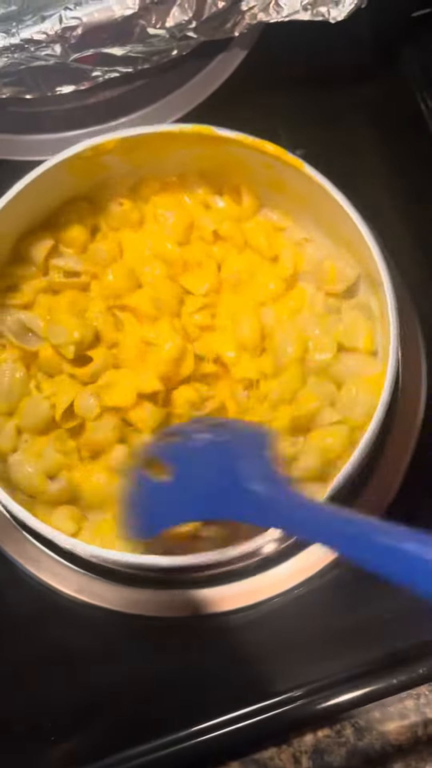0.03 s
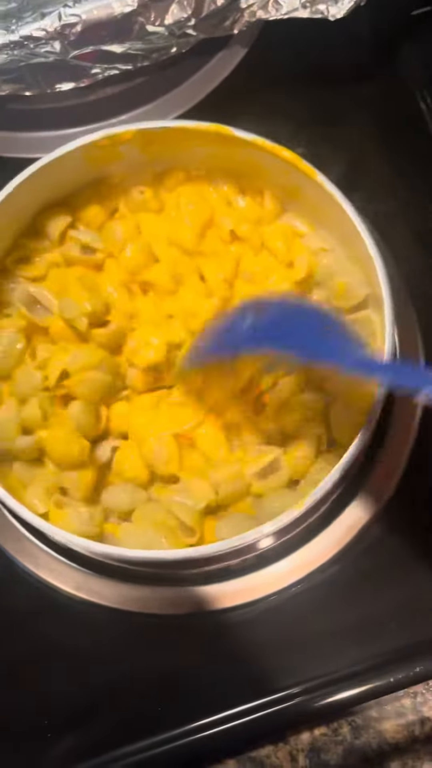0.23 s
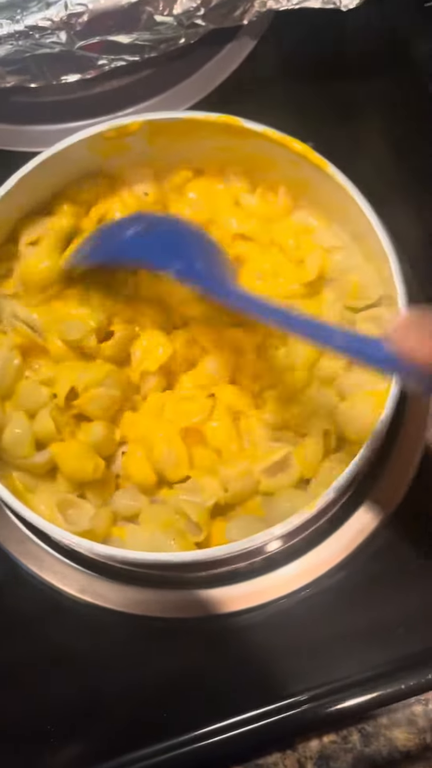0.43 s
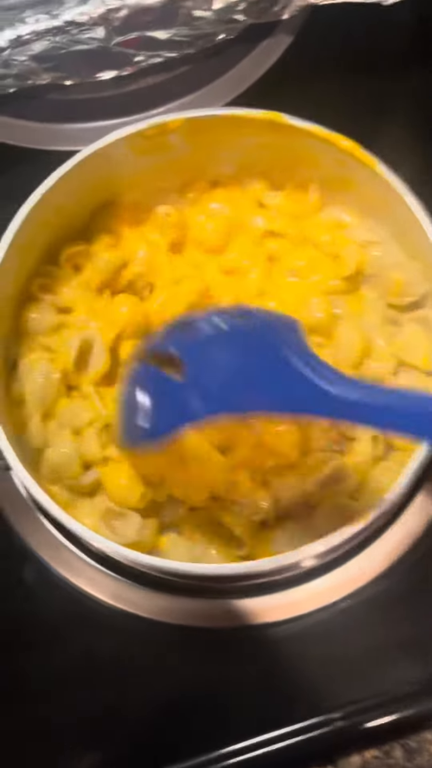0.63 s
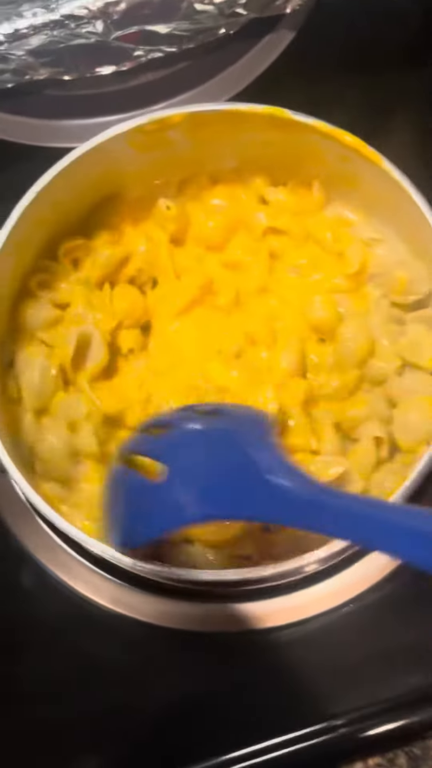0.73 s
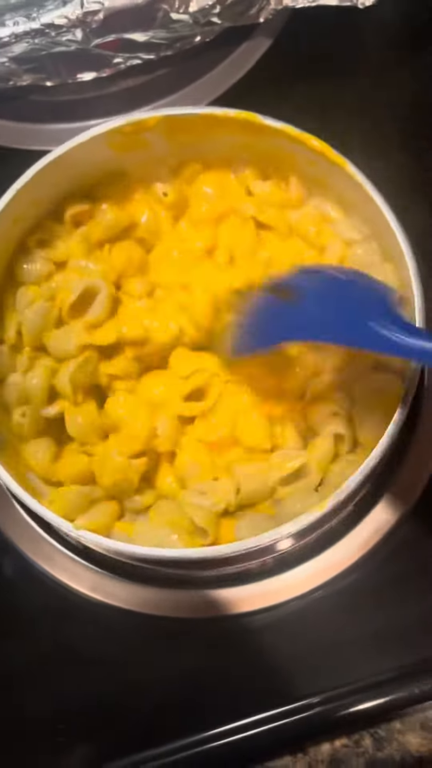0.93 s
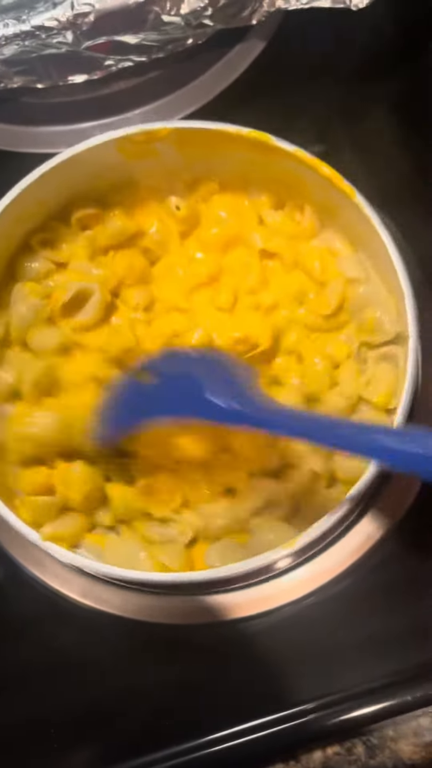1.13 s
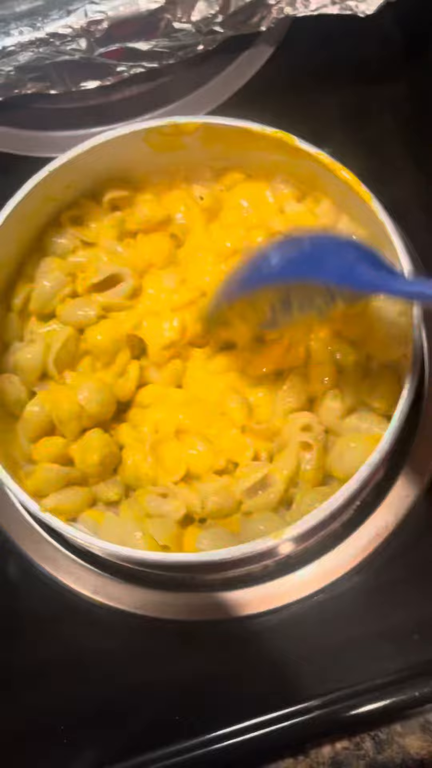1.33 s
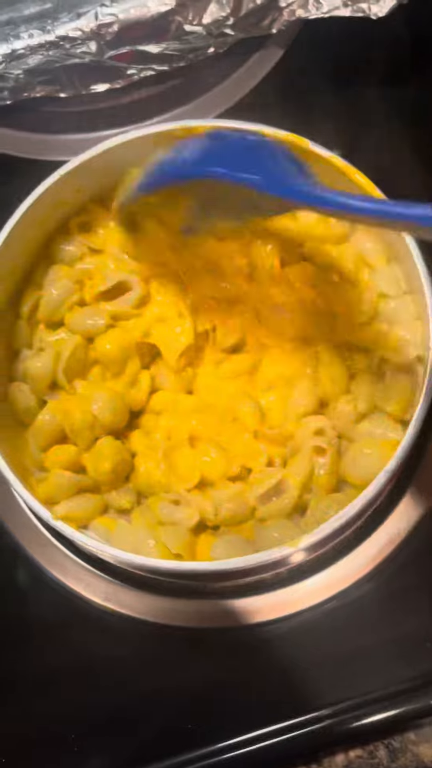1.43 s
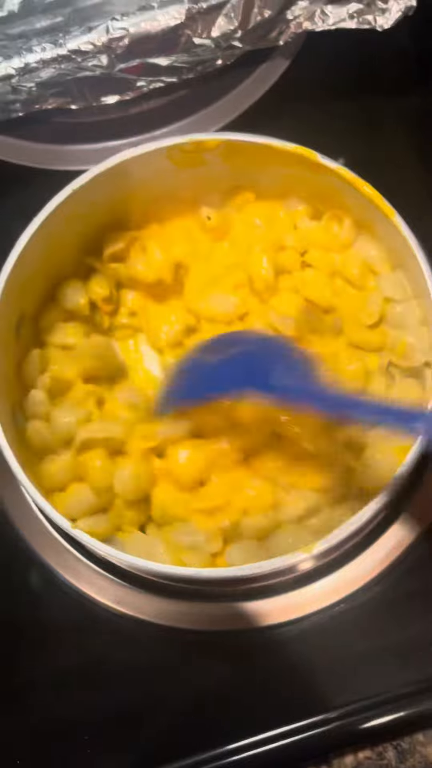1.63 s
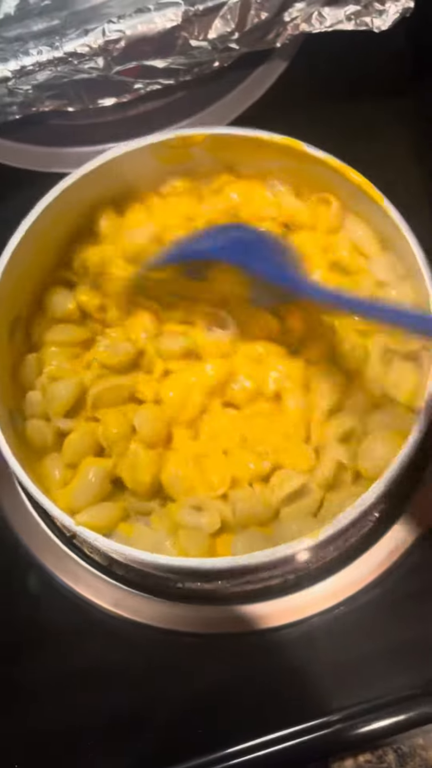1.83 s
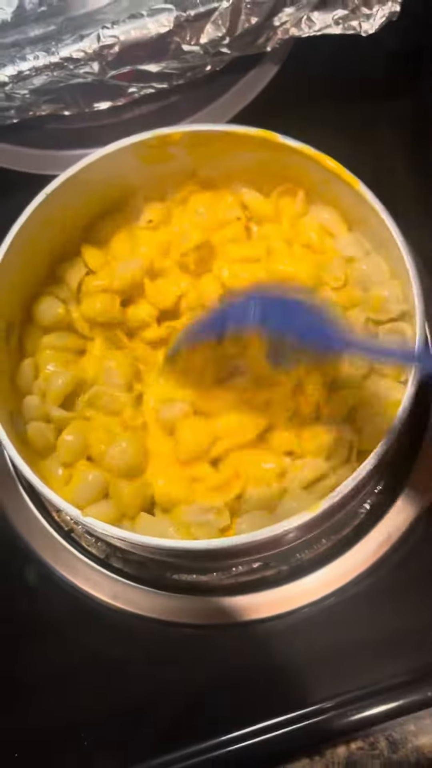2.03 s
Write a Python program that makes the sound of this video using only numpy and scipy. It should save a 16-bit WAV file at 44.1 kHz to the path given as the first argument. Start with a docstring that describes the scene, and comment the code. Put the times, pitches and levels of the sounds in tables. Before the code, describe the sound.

Wet pasta being stirred with a spoon, with sticky squelches, dull knocks and scrapes against a metal pot

```python
"""Stirring sticky pasta in a metal pot

A plastic spoon stirs thick, sticky pasta in a metal pot on a stove, close to a two-port phone microphone.
The spoon knocks as blunt tone bursts and noise rattles that ring the pot's modes; it scrapes as clumpy noise.
The pot thuds on its ring as low tone bursts, air pockets pop as rising tones, sauce films snap as treble ticks.
A small kitchen answers with a short, dull noise tail, over rumble, a wavering low hum and a draught."""
import sys
import numpy as np
from scipy import signal
from scipy.fft import rfft, irfft, next_fast_len
from scipy.io import wavfile
from scipy.ndimage import uniform_filter1d

SR = 44100
rng = np.random.default_rng(int(sys.argv[2]) if len(sys.argv) > 2 else 0)


def generate_wav(signal):
    """Clip the signal to [-1, 1] and save it as 16-bit WAV at the path in sys.argv[1]."""
    frames = np.transpose(np.atleast_2d(signal))
    scaled = np.clip(frames, -1, 1) * 32767
    pcm = np.round(scaled).astype(np.int16)
    wavfile.write(sys.argv[1], SR, pcm)


N = 92124

LEFT_RIGHT = np.array([[1], [-1]])  # opposite signs for the two channels
CLUMP_DB, CLUMP_PER_S = 2, 50  # uneven stickiness


def undb(db):
    """Turn dB into gain."""
    return 10 ** (np.asarray(db) / 20)


def unit(x):
    """Scale to rms 1."""
    return x / np.sqrt(np.mean(x ** 2))


def colour(x, table):
    """Shape the spectrum by (hz, db) points, joined along log frequency."""
    hz = np.arange(N // 2 + 1) * SR / N + 1
    point_hz, point_db = np.array(table, float).T
    return irfft(rfft(x) * undb(np.interp(np.log(hz), np.log(point_hz), point_db)), N)


def add(out, start_s, x):
    """Mix x into out at start_s seconds."""
    i = int(start_s * SR)
    out[i:i + len(x)] += x[:max(N - i, 0)]


def decay(t, t60_s):
    """An exponential fall of 60 dB in t60_s."""
    return 1000. ** (-t / t60_s)


def white(count=N):
    """White noise."""
    return rng.standard_normal(count)


def resonate(x, hz, q):
    """Pass x through one resonance."""
    return signal.lfilter(*signal.iirpeak(hz, q, SR), x)


def ring(hz, t60_s, rise_s, glide=0.):
    """A decaying tone with a short rise, peak near 1; pitch climbs by the share glide each cycle."""
    t = np.arange(int(SR * t60_s) + 8) / SR
    env = (1 - np.exp(-t / max(rise_s, 1e-5))) ** 2 * decay(t, t60_s)
    return env / env.max() * np.sin(2 * np.pi * hz * t * (1 + glide * hz * t / 2))


def bump(hz, cycles, peak_at):
    """A tone burst that swells, peaks at a share of its length and is gone."""
    u = np.linspace(0, 1, int(SR * cycles / hz))
    warp = np.log(.5) / np.log(peak_at)  # brings the top of the swell to peak_at
    return np.sin(np.pi * u ** warp) ** 2 * np.sin(2 * np.pi * cycles * u)


def walk(rate):
    """Random levels held for 1 / rate seconds and smoothed; spread 1."""
    k = int(SR / rate)
    held = np.repeat(white(N // k + 1), k)
    return unit(uniform_filter1d(held, k)[:N])


def clumpy(table):
    """Noise in half-octave bands that slip together and each squelch on their own."""
    slip_db = 3 * walk(150)
    out = 0
    for hz in 140 * 2 ** np.arange(0, 6.6, .5):
        band = resonate(white(), hz, 3) / np.sqrt(hz)  # about equal power per band
        out = out + band * undb(slip_db + CLUMP_DB * walk(CLUMP_PER_S))
    return colour(out, table)


def pot(x):
    """The metal pot under force x: the force itself plus its damped modes."""
    # modes of the pot: pitch_hz, width_hz, level_db (before the common level and a boost for narrow modes)
    modes = [(301, 13, -8), (549.5, 40, -3.5), (833.3, 22, 0), (1041, 40, 2), (1380, 120, 1),
             (1825, 240, -0.5), (2281, 46, -1.5), (2440, 33, 5), (2998, 90, -2)]
    modes_db = -13.5
    out = x.copy()
    for hz, width_hz, db in modes:
        out += undb(db + modes_db) * np.sqrt(hz / width_hz) * resonate(x, hz, hz / width_hz)
    return out


def kitchen():
    """Rumble and a wavering hum, alike left and right, and a low draught, opposite on the two ports."""
    # colour of the kitchen rumble: hz, level_db (relative)
    rumble_colour = [(25, -3.5), (45, 12), (80, 5.5), (130, 1), (240, -10), (610, -11), (800, -24.5),
                     (3300, -44.5), (12000, -37.5)]
    # air stirred over the two ports: time_s, level_db
    draught_level = [(.34, -73), (.44, -44), (.58, -57), (.68, -65), (.8, -43), (.97, -49), (1.06, -61),
                     (1.42, -78)]
    rumble_db, hum_db, hum_hz, draught_top_hz = -49, -51.5, 110.8, 122

    rumble = unit(colour(white(), rumble_colour)) * undb(rumble_db + 2.0 * walk(4.42))
    hum_pitch_hz = hum_hz * (1 + 0.0322 * walk(9))
    hum = np.sin(2 * np.pi * np.cumsum(hum_pitch_hz) / SR) * undb(hum_db + 2.8 * walk(6.85))
    draught = unit(signal.lfilter(*signal.butter(2, draught_top_hz, fs=SR), white()))
    draught *= undb(np.interp(np.arange(N) / SR, *np.array(draught_level).T))
    return draught * LEFT_RIGHT + rumble + hum


def room(x):
    """The room's diffuse, dull tail: decaying noise, partly different in each channel."""
    t60_s, level_db, top_hz, width = 0.21, -15, 5750, 0.9
    t = np.arange(int(SR * .5)) / SR
    tail = white((3, len(t))) * decay(t, t60_s) * (t > .004)
    # one tail shared by both channels, plus one of their own
    tail = signal.lfilter(*signal.butter(1, top_hz, fs=SR), tail[0] + width * tail[1:])
    tail /= np.sqrt(np.sum(tail[0] ** 2))
    return signal.fftconvolve(x[None], tail, axes=1)[:, :N] * undb(level_db)


def thuds():
    """The full pot rocks on its ring: low tone bursts that swell fast and die away."""
    # rocks of the pot: start_s, level_db, pitch_hz
    rocks = [(.03, -26, 161.3), (.085, -31.5, 156), (.452, -32, 168.6), (0.701, -32, 242),
             (0.731, -36, 204), (0.843, -36.5, 158), (.965, -33.5, 215.5), (1.025, -29, 164.8),
             (1.151, -38.5, 183), (1.628, -37.5, 170), (1.844, -37, 167.6)]
    out = np.zeros(N)
    for start_s, db, hz in rocks:
        add(out, start_s, undb(db) * bump(hz, cycles=8.3, peak_at=0.18))
    return out


def pops():
    """Air pockets pop: short bubble tones rising in pitch, with a squish of noise around that pitch."""
    # air pockets in the sauce: start_s, level_db, pitch_hz (at the start)
    pockets = [(0.259, -44, 2150), (.259, -42, 3920), (.366, -44, 1680), (0.401, -40, 3740),
               (.462, -41, 2940), (.463, -41.5, 1400), (.494, -45.5, 1800), (0.495, -42.5, 3280),
               (0.51, -41.5, 3000), (0.539, -38, 5400), (.651, -32.5, 3380), (.681, -34, 2400),
               (0.699, -23.5, 3020), (0.733, -31, 3300), (.752, -29, 1730), (0.773, -40, 2500),
               (0.783, -36.5, 2960), (.892, -36, 3770), (1.087, -37.5, 2780), (1.454, -42, 3640),
               (1.514, -42, 1520), (1.52, -36.5, 2680), (1.562, -35, 3300), (1.603, -35.5, 3500),
               (1.81, -39, 1600), (1.848, -38.5, 825), (1.871, -36.5, 3310), (1.915, -43, 3520),
               (1.933, -39.5, 990), (1.996, -49, 3850), (2.051, -48, 950)]
    squish_db, squish_t60_s = -9, 0.04  # level relative to the bubble
    out, t = np.zeros(N), np.arange(SR // 10) / SR
    for start_s, db, hz in pockets:
        squish = unit(resonate(white(len(t)), hz, 1.2))
        add(out, start_s, undb(db) * ring(hz, t60_s=17.7 / hz, rise_s=1 / hz, glide=0.018))
        add(out, start_s, undb(db + squish_db) * squish * decay(t, squish_t60_s))
    return out


def snaps():
    """Sauce films snap: very short treble tones with a fizz of high noise behind."""
    # snapping films: start_s, level_db, pitch_hz
    films = [(0.322, -37, 10380), (0.351, -39.5, 7440), (0.3881, -45, 10200), (0.4212, -32, 11720),
             (0.4694, -43, 10520), (0.4946, -45, 10540), (0.528, -43, 6200), (0.5693, -41.5, 10230),
             (0.5923, -42.5, 10470), (0.6979, -24, 5340), (0.784, -29, 9760), (0.8612, -28, 5840),
             (0.9231, -31, 6600), (0.944, -39, 10800), (1.064, -32, 9770), (1.1722, -37, 10740),
             (1.2047, -34, 11330), (1.3392, -46.5, 9750), (1.3707, -46.5, 6340), (1.4873, -41, 5900),
             (1.566, -37.5, 10380), (1.6282, -34, 5730), (1.6798, -33.5, 7300), (1.8598, -38, 10670),
             (1.912, -33, 5560), (1.985, -35, 5770), (2.032, -39.5, 6640)]
    fizz_db, fizz_t60_s = -5, 0.05  # level relative to the tick
    out, t = np.zeros(N), np.arange(SR // 10) / SR
    high = signal.butter(2, 4000, "high", fs=SR)
    for start_s, db, hz in films:
        fizz = signal.lfilter(*high, white(len(t))) * decay(t, fizz_t60_s)
        add(out, start_s, undb(db) * ring(hz, t60_s=0.0084, rise_s=0.0001))
        add(out, start_s, undb(db + fizz_db) * fizz)
    return out


def crackle(hiss):
    """Mix tiny rising bubbles, at random times, pitches and sizes, into the hiss."""
    per_s, least_db, spread_db = 450, 2, 3
    for at, pitch, size in rng.random((int(per_s * N / SR), 3)):
        hz = 2120.0 * 5.0 ** pitch
        db = least_db + spread_db * min(-np.log(1 - size), 4.)  # few big bubbles, many small
        add(hiss, at * N / SR, undb(db) * ring(hz, t60_s=12.0 / hz, rise_s=2.0 / hz, glide=0.068))


def rub():
    """The spoon edge rubs the bare pot wall: one bright band of noise, faded in and out."""
    # the rub: start_s, end_s, fade_s (outside start and end), pitch_hz, width_hz, level_db
    stroke = (1.73, 1.81, .03, 4050, 380, -50)
    start_s, end_s, fade_s, hz, width_hz, db = stroke
    t = np.arange(N) / SR
    noise = unit(resonate(white(), hz, hz / width_hz)) * undb(db + walk(CLUMP_PER_S))
    return noise * np.clip(np.minimum(t - start_s, end_s - t) / fade_s + 1, 0, 1)


def drag():
    """The spoon drags: stick-slip scrape through the pot, sticky hiss full of tiny bubbles, one rub."""
    # spoon drag: time_s, scrape_db (on the pot), hiss_db (of the sauce)
    strokes = [(0, -37, -49.5), (.17, -47, -58), (.4, -65, -75), (0.438, -48.5, -54.5), (.6, -61.5, -68),
               (.7, -48.5, -55), (0.801, -47, -49.5), (.93, -53.5, -57.5), (1.04, -42, -51.5),
               (1.12, -45, -53), (1.16, -38, -57), (1.248, -40, -43.5), (1.301, -63.5, -89),
               (1.41, -75, -69), (1.471, -62.5, -55), (1.58, -54.5, -57.5), (1.7, -43.5, -52),
               (1.77, -42.5, -56.5), (1.902, -50.5, -51.5), (1.961, -60.5, -65.5), (2.065, -71, -80),
               (2.089, -49, -61)]
    # colour of the scrape ahead of the pot: hz, level_db (relative)
    scrape_colour = [(120, -0.5), (300, 0), (600, 1.5), (1200, -5), (2500, -10.5), (4500, -24), (8000, -40),
                     (13000, -17)]
    # colour of the sticky hiss: hz, level_db (relative)
    hiss_colour = [(1500, -43), (3000, -1.5), (6000, 6.5), (9000, 5.5), (11000, 13.5), (13000, 12)]

    time_s, scrape_db, hiss_db = np.array(strokes, float).T
    t = np.arange(N) / SR
    scrape = unit(pot(clumpy(scrape_colour)))
    hiss = unit(clumpy(hiss_colour) * undb(2.8 * walk(35.43)))
    crackle(hiss)
    scrape *= undb(np.interp(t, time_s, scrape_db))
    hiss *= undb(np.interp(t, time_s, hiss_db))
    return rub() + scrape + hiss


def knocks():
    """The spoon knocks the pot: a blunt contact tone, and a noise rattle that rings the pot's modes."""
    # knocks: start_s, level_db, contact_pitch_hz, rattle_t60_s,
    # rattle_db (relative to the contact, ahead of the pot), rattle_tilt_db_per_octave (above 300 Hz)
    hits = [(.028, -16.5, 997, 0.048, -1.5, -6), (.040, -29.5, 620, 0.19, -2.5, -5.5),
            (.066, -15.5, 530, 0.11, 1.5, 0.5), (.070, -15.5, 803, 0.11, -4.5, -3),
            (.084, -27, 540, 0.07, -2, -1.5), (.412, -44.5, 558, 0.24, -2, -7.5),
            (.423, -42, 1000, 0.064, -4, -7.5), (0.469, -36, 1320, 0.026, 4, -6),
            (.698, -28.5, 1610, 0.082, -3.5, -5.5), (.699, -28, 1040, 0.17, -5, -7),
            (0.729, -33, 460, 0.093, 2.5, -6.5), (0.784, -40.5, 532, 0.059, 5, -5.5),
            (.834, -18, 930, 0.066, -9.5, -5), (.952, -19, 2070, 0.16, -5.5, -5.5),
            (.955, -23, 984, 0.34, -12.5, -6), (.993, -28.5, 846, 0.044, -15, -9),
            (1.141, -38.5, 880, 0.21, -0.5, -3.5), (1.419, -46, 1800, 0.055, 5, -1.5),
            (1.614, -24, 870, 0.12, -5.5, -4.5), (1.630, -31, 1710, 0.12, 4, -4.5)]
    rattle_rise_s = 0.00048
    tone, rattle, t = np.zeros(N), np.zeros(N), np.arange(SR // 3) / SR
    f = np.maximum(np.arange(len(t) // 2 + 1) * SR / len(t), 300.)
    for start_s, db, hz, t60_s, rattle_db, tilt_db in hits:
        add(tone, start_s, undb(db) * bump(hz, cycles=8.35, peak_at=0.41))
        tilt = undb(tilt_db * np.log2(f / 1000))
        noise = unit(irfft(rfft(white(len(t))) * tilt, len(t)))
        env = (1 - np.exp(-t / rattle_rise_s)) * decay(t, t60_s)
        add(rattle, start_s, undb(db + rattle_db) * noise * env)
    rattle *= undb(2.8 * walk(300))  # rough, uneven contact
    return tone, pot(signal.lfilter(*signal.butter(2, 220, "high", fs=SR), rattle))


def scene():
    """Everything at the pot, the room's answer to all but the blunt contacts, and the kitchen."""
    tone, rattle = knocks()
    ringing = rattle + thuds() + pops() + snaps() + drag()
    return tone + ringing + room(ringing) + kitchen()


def record(dry):
    """Two phone ports with a phase and level step between them, microphone colour, a steep top cut."""
    # phase between the ports: hz, left_lead_radians
    port_phase = [(0, 0), (1120, -.3), (2150, .2), (2840, .8), (3880, .7), (4570, 1.7), (5080, 4.2),
                  (5680, 6.2), (6200, 6.4), (8350, 9.1), (9560, 9.6), (10900, 11.1), (12000, 12.3)]
    # level between the ports: hz, left_minus_right_db
    port_balance = [(100, -.2), (350, -1), (2500, -0.7), (5000, 0.72)]
    # colour of the microphone: hz, level_db
    mic_colour = [(20, -16), (45, 0.5), (3300, -1), (4100, -4.5), (4900, 1.5), (6000, -3), (9300, 5),
                  (11000, 4), (11900, -13.5), (12800, -36), (15000, -54)]
    top_hz = 15600

    size = next_fast_len(N + 4096)
    f = np.arange(size // 2 + 1) * SR / size
    phase_hz, lead = np.array(port_phase, float).T
    balance_hz, step_db = np.array(port_balance, float).T
    # each port takes half of the lead and half of the step
    lead = np.interp(f, phase_hz, lead) / 2
    step_db = np.interp(np.log(f + 1), np.log(balance_hz), step_db) / 2
    ports = np.exp(1j * LEFT_RIGHT * lead) * undb(LEFT_RIGHT * step_db)
    heard = irfft(rfft(dry, size) * ports, size)[:, :N]
    top_cut = signal.ellip(8, .2, 60, top_hz, fs=SR, output="sos")
    return signal.sosfilt(top_cut, colour(heard, mic_colour))


dry = scene()
out = record(dry)
generate_wav(out)
```